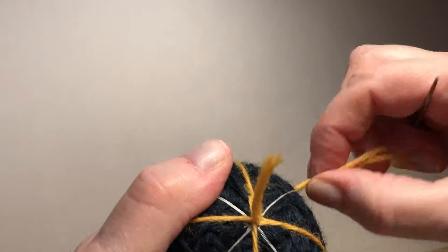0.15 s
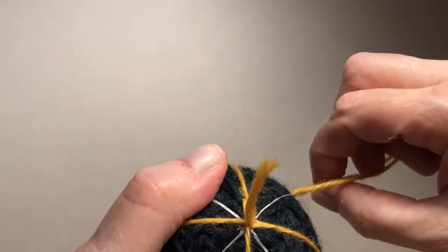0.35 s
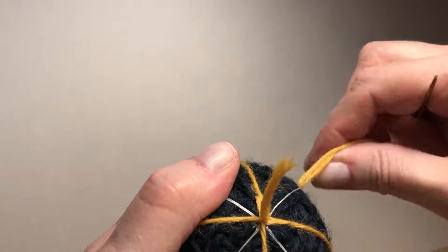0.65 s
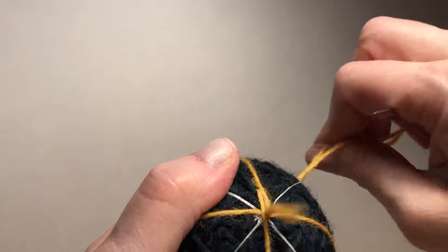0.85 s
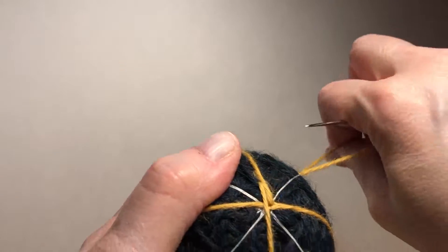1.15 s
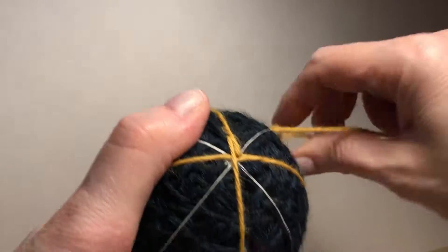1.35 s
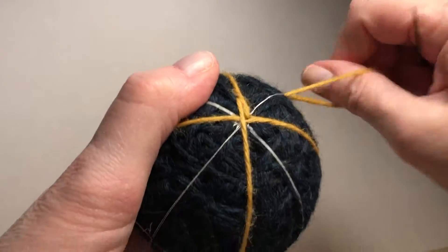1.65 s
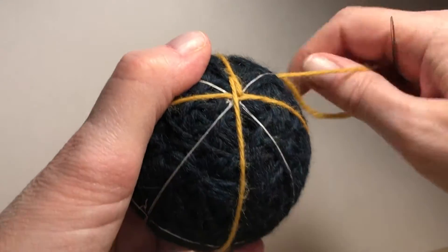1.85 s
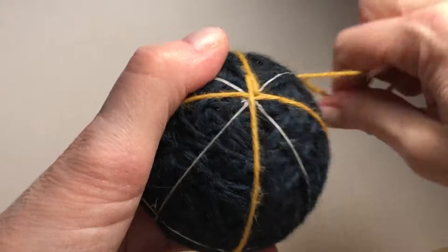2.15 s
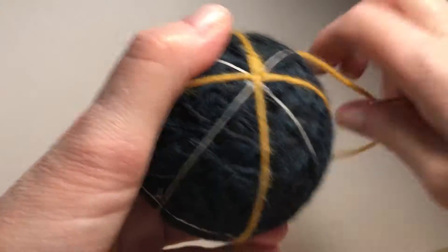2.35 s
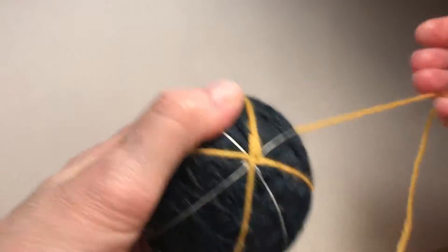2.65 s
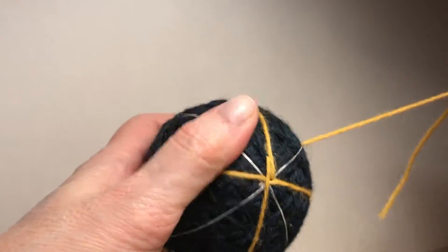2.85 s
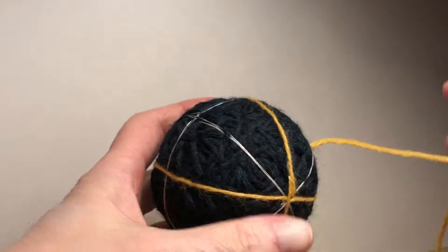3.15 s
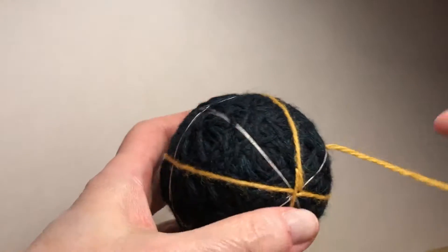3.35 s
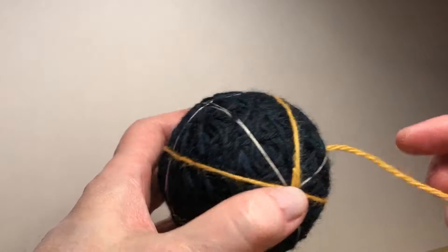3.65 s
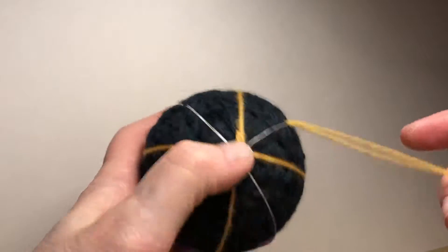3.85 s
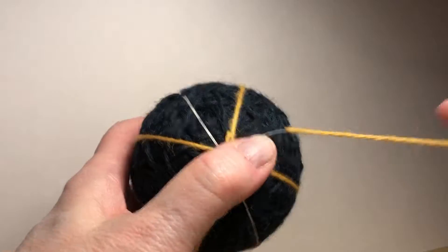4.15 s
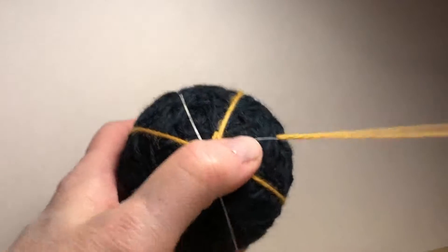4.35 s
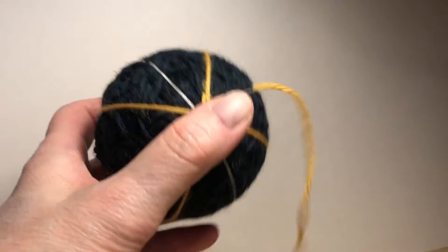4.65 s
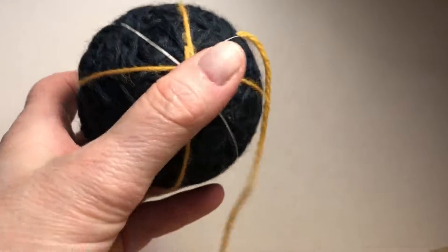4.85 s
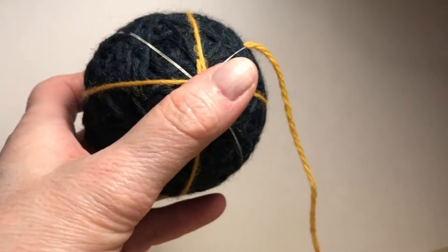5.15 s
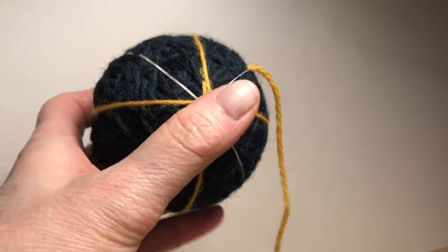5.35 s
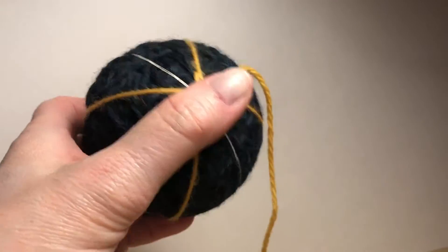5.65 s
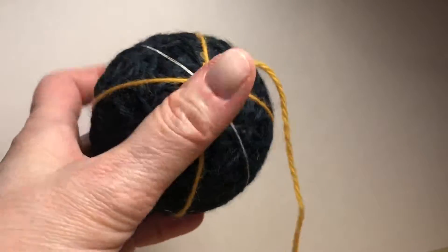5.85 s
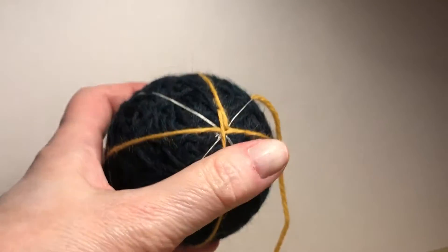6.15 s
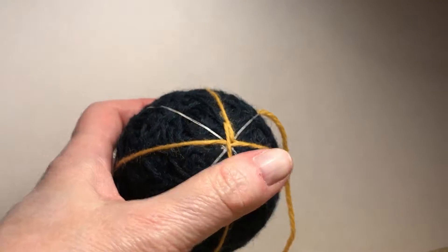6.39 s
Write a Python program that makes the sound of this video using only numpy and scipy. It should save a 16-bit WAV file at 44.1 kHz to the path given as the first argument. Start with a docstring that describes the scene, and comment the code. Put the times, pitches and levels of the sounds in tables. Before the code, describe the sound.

Thread rustles in short dry strokes with tiny needle ticks over a low indoor hum, then scissors snip sharply and clatter onto a table.

```python
"""A quiet room hums throughout: steady tones, a fan's air and a faintly buzzing lamp.
Thread is drawn around a yarn ball in short noisy strokes, with a few needle ticks; then it sings, pulled taut.
Small steel scissors are gripped with a soft knock, then snip with clicks, grinding and ringing blades.
Last, the scissors clatter onto a table and slide: noise bursts and friction excite its resonances."""
import sys
import numpy as np
from scipy import signal
from scipy.fft import rfft, irfft, next_fast_len
from scipy.io import wavfile
from scipy.ndimage import map_coordinates

SR = 44100
rng = np.random.default_rng(int(sys.argv[2]) if len(sys.argv) > 2 else 0)


def materialize(psi):
    """Save the field psi as 16-bit PCM at rate SR to the path in sys.argv[1].

    A 1-D psi becomes a single channel; in a 2-D psi each row is a channel.
    """
    bounded = np.clip(np.atleast_2d(psi).T, -1, 1)
    quanta = np.round(bounded * 32767).astype(np.int16)
    wavfile.write(sys.argv[1], SR, quanta)


N = 287516  # length in samples
TOP_HZ = 16050  # upper band limit


def amp(db):
    """Turn decibels into a gain."""
    return 10 ** (np.asarray(db) / 20)


def unit(x):
    """Scale to an rms of 1."""
    return x / np.sqrt(np.mean(np.abs(x) ** 2) + 1e-20)


def along(points, hz):
    """Read a curve of (Hz, value) points, with straight lines between them on a log frequency axis."""
    f, v = np.transpose(points)
    return np.interp(np.log(hz + 1), np.log(f + 1), v)


def wobble(rate):
    """A smooth random curve with this many random knots a second."""
    knots = rng.standard_normal(int(N * rate / SR) + 4)
    return map_coordinates(knots, [np.arange(N) * rate / SR])


def filtered(x, response):
    """Filter x by a function of frequency, scaled so that white noise keeps its power."""
    size = next_fast_len(N + SR // 2)
    gains = unit(response(np.fft.rfftfreq(size, 1 / SR)))
    return irfft(rfft(x, size) * gains, size)[:N]


def coloured(x, spectrum):
    """Give x the tone colour of (Hz, relative dB) points."""
    return filtered(x, lambda hz: amp(along(spectrum, hz)))


def resonate(x, modes, soft_hz=15000):
    """Let x ring in (Hz, width in Hz, relative dB) resonances, dulled above soft_hz as by a soft touch."""
    def response(f):
        ring = sum(amp(db) * 1j * f * width / (centre * centre - f * f + 1j * f * width)
                   for centre, width, db in modes)
        return ring / (1 + np.sqrt(2) * 1j * f / soft_hz - (f / soft_hz) ** 2)
    return filtered(x, response)


def friction(rate, spread_db):
    """Noise of rms 1 whose strength jumps with each tiny slip."""
    return unit(rng.standard_normal(N) * amp(spread_db * wobble(rate)))


def contacts(times, levels_db, t60):
    """Brief dying noise bursts; a level is the burst's energy spread over one millisecond."""
    force, t = np.zeros(N + SR), np.arange(SR // 20) / SR
    for start, db in zip(times, levels_db):
        burst = rng.standard_normal(len(t)) * amp(-60 * t / t60)
        burst *= np.sqrt(SR / 1000 / np.sum(burst ** 2))
        force[round(start * SR):][:len(t)] += amp(db) * burst
    return force[:N]


def swell(middle, length, shape):
    """A gain that rises to 1 and falls again, staying above half power for the given length."""
    u = np.abs(np.arange(N) / SR - middle) / (length / 2)
    return np.sqrt(.5 ** (np.minimum(u, 10) ** shape))


def strokes(rows, shape):
    """One gain curve for each dB column of (middle, length, dB, ..) rows; overlaps add in power."""
    return np.sqrt(sum(np.outer(amp(levels), swell(middle, length, shape)) ** 2
                       for middle, length, *levels in rows))


def held(start, end, attack_s, release_s, sag_db_per_s):
    """An attack, a hold that sags, then a release losing a further 60 dB in release_s."""
    t = np.arange(N) / SR
    fade_db = sag_db_per_s * np.maximum(t - start, 0) + 60 * np.maximum(t - end, 0) / release_s
    return np.clip((t - start) / attack_s, 0, 1) * amp(-fade_db)


# Mains and fan tones. Each row: pitch in Hz, level in dB.
HUM_TONES = [(119.4, -55), (71.5, -69.5), (110.6, -71.5), (145.9, -67), (221.3, -71), (328.5, -81)]
# Tone colour of the moving air. Each row: frequency in Hz, relative level in dB.
AIR_COLOUR = [(24, -46), (40, 0), (75, -1.5), (100, -1.5), (122, 3.5), (152, 1.5), (172, -9.5), (230, -6.5),
              (380, -11), (520, -19), (1000, -22.5), (2000, -27.5), (4500, -34.5), (15000, -41.5)]
# Resonances in the fan's air. Each row: pitch in Hz, width in Hz, relative level in dB.
FAN_MODES = [(584, 12.5, -0.5), (651, 25, 0.5), (895, 24, 1), (1085, 24, -0.5)]
# Resonances of the buzzing lamp. Each row: pitch in Hz, width in Hz, relative level in dB.
LAMP_MODES = [(6160, 200, -7.5), (9260, 120, 0), (9630, 160, -8), (9850, 93, -4.5)]
MAINS_BUZZ_HZ = 119.96  # lamp ticks a second: twice the mains frequency


def background():
    """Nearly steady hum, a fan's air, and a lamp that ticks once every half cycle of the mains."""
    t = np.arange(N) / SR
    hum = sum(np.sqrt(2) * amp(db + 0.31 * wobble(3.08)) * np.sin(2 * np.pi * hz * t + 0.16 * wobble(2.1))
              for hz, db in HUM_TONES)
    air = amp(-57) * coloured(rng.standard_normal(N), AIR_COLOUR)
    fan = amp(-73.5) * resonate(rng.standard_normal(N), FAN_MODES, soft_hz=1450)
    since_tick = (t * MAINS_BUZZ_HZ % 1 - .5) / MAINS_BUZZ_HZ  # seconds from the nearest tick
    ticks = unit(np.sinc(2 * TOP_HZ * since_tick))
    sizzle = unit(np.cos(np.pi * MAINS_BUZZ_HZ * since_tick) ** 2 * rng.standard_normal(N))
    lamp = amp(-79.5) * resonate(ticks + amp(-1) * sizzle, LAMP_MODES, soft_hz=14900)
    return hum + air + fan + lamp


# Strokes of thread. Each row: middle in seconds, length in seconds, then three levels in dB before
# any trim in thread(): rub on the fingers, rustle of the yarn, hiss of the fibres.
THREAD_STROKES = [(.382, 0.058, -57.5, -74, -63.5), (.456, 0.054, -62.5, -72, -74),
                  (.57, .046, -88, -88, -71.5), (.694, .047, -84, -82, -73), (.846, 0.035, -59, -76, -69),
                  (1.05, 0.13, -59.5, -63.5, -54), (1.238, .11, -80, -62.5, -62),
                  (1.55, .06, -75, -79, -70), (2.192, 0.048, -59.5, -64, -67),
                  (2.252, 0.053, -57, -62, -57.5), (2.345, 0.052, -64, -67, -66),
                  (2.611, 0.053, -67, -64.5, -69), (2.765, 0.037, -69, -72, -79),
                  (3.169, 0.058, -68, -65.5, -65), (3.442, 0.043, -80, -71, -76),
                  (4.05, 0.073, -74, -67.5, -78), (4.403, 0.15, -68, -71.5, -69),
                  (4.71, .044, -70, -75, -72)]
# Tone colours of the rub, the yarn and the fibres. Each row: frequency in Hz, relative level in dB.
RUB_COLOUR = [(700, -34), (1300, -12), (1520, -0.5), (1800, 2), (2120, -9), (2400, 0), (2850, -4),
              (3400, -10), (4300, -11), (6000, -11), (8000, -22)]
YARN_COLOUR = [(1200, -29), (2100, -8), (2600, -2.5), (3300, -2), (4100, -1), (4900, -4), (6500, -6.5),
               (9000, -12), (15000, -18)]
FIBRE_COLOUR = [(2500, -12), (3800, 0.5), (7000, -1), (9000, 1.5), (12000, -3), (15500, 6), (18000, -10)]
# Needle and fingernail ticks. Each row: start in seconds, level in dB before the trims in thread().
NEEDLE_TICKS = [(0.4364, -42.5), (0.467, -49), (0.4828, -38.5), (2.1032, -44.5), (2.426, -56), (4.349, -45)]
# Skin rubbing on the ball and on the scissor grips.
# Each row: middle in seconds, length in seconds, level in dB.
PALM_RUBS = [(1.66, 0.2, -66.5), (2.04, .22, -63), (5.479, 0.017, -56)]
# Tone colour of skin. Each row: frequency in Hz, relative level in dB.
SKIN_COLOUR = [(200, -13), (400, -2.5), (540, -3), (750, -14), (1300, -11), (2500, -27)]
STROKE_SHAPE = 3.1  # 2 = bell-shaped swell, higher = flatter top
# faint stirring of the fibres while the thread is handled; the hiss level is before its trim
HANDLING_END_S, STIR_RUSTLE_DB, STIR_HISS_DB, STIR_SWING_DB = 4.8, -77, -80, 4.5


def thread():
    """Each stroke swells and fades as fibres slide; the needle ticks on a nail, skin rubs ball and grips."""
    rub_gain, rustle_gain, hiss_gain = strokes(THREAD_STROKES, STROKE_SHAPE)
    stir = held(0, HANDLING_END_S, attack_s=0.015, release_s=0.54, sag_db_per_s=0)
    stir = stir * amp(STIR_SWING_DB * wobble(11))
    # strokes and stirring add in power
    rustle_gain = np.hypot(rustle_gain, amp(STIR_RUSTLE_DB) * stir)
    hiss_gain = np.hypot(hiss_gain, amp(STIR_HISS_DB) * stir)
    rub = amp(-3.5) * rub_gain * coloured(friction(rate=340, spread_db=2.5), RUB_COLOUR)
    rustle = rustle_gain * coloured(friction(rate=250, spread_db=1.5), YARN_COLOUR)
    hiss = amp(-1.5) * hiss_gain * coloured(friction(rate=710, spread_db=1.5), FIBRE_COLOUR)
    palm = strokes(PALM_RUBS, STROKE_SHAPE)[0] * coloured(friction(rate=120, spread_db=1.2), SKIN_COLOUR)
    tick_force = contacts(*np.transpose(NEEDLE_TICKS), t60=0.016)
    ticks = amp(-6.5) * coloured(tick_force, RUB_COLOUR) + amp(-13) * coloured(tick_force, FIBRE_COLOUR)
    return rub + rustle + hiss + palm + ticks


# the taut thread sings while it is pulled, and twangs once as it catches
TAUT_START_S, TAUT_END_S, TAUT_HZ, TAUT_DB, TAUT_SAG_DB_PER_S = 4.3, 4.69, 1790, -68, 15
TWANG_S, TWANG_DB, TWANG_T60_S = 4.35, -58, .06


def taut_thread():
    """Stick-slip on the stretched thread gives a thin note, unsteady in pitch and loudness."""
    pull = held(TAUT_START_S, TAUT_END_S, attack_s=0.057, release_s=.3, sag_db_per_s=TAUT_SAG_DB_PER_S)
    twang = held(TWANG_S, TWANG_S, attack_s=0.0012, release_s=TWANG_T60_S, sag_db_per_s=0)
    gain = amp(TAUT_DB) * pull + amp(TWANG_DB) * twang
    phase = 2 * np.pi * np.cumsum(TAUT_HZ * (1 + .035 * wobble(350))) / SR
    return np.sqrt(2) * gain * amp(2.8 * wobble(70)) * np.sin(phase)


# edge grinds along edge, lightly at first, then biting through the fibres
CLOSE_START_S, CLOSE_DB = 5.55, -48.5
BITE_START_S, BITE_END_S, BITE_DB, BITE_SAG_DB_PER_S = 5.618, 5.682, -41, 63
FIBRE_SNAPS_PER_S, FIBRE_SNAP_DB, FIBRE_SCATTER_DB = 170, 6, 1  # snap level is over the grinding


def fibre_snaps(count):
    """Fibres part one after another under the blades, unevenly in time and strength."""
    chance = rng.standard_normal((count, 2))
    times = BITE_START_S + (np.arange(count) + .5 + .25 * chance[:, 0]) / FIBRE_SNAPS_PER_S
    return contacts(times, FIBRE_SNAP_DB + FIBRE_SCATTER_DB * chance[:, 1], t60=0.0055)


# A soft knock as the handles are gripped, then blades catching as they close.
# Each row: start in seconds, edge click in dB, handle knock in dB, blade ring in dB.
SCISSOR_KNOCKS = [(5.4696, -70, -55, -85), (5.533, -30, -30, -52), (5.5468, -19.5, -29.5, -44),
                  (5.5516, -28, -27.5, -31), (5.563, -31, -37, -60), (5.5845, -28, -37, -60),
                  (5.5944, -18.5, -44, -48), (5.5978, -22.5, -28, -62), (5.605, -23, -36, -60)]
# Tone colour of the steel edges. Each row: frequency in Hz, relative level in dB.
EDGE_COLOUR = [(1500, -14), (3000, -7), (3900, -8), (4400, -2.5), (5000, -2), (5600, -3), (6300, 0.5),
               (7700, 0), (8400, -3), (9300, -2), (10100, -2), (11000, -3.5), (13400, 0), (15000, -1.5),
               (16500, -0.5), (19000, -30)]
# Resonances of the handles. Each row: pitch in Hz, width in Hz, relative level in dB.
HANDLE_MODES = [(500, 140, -7.5), (910, 320, -15), (1320, 105, 3), (1760, 430, -2), (2240, 93, -16),
                (2460, 78, -1.5), (2820, 160, -1), (3190, 84, -7.5)]
# The tabletop's low resonances. Each row: pitch in Hz, width in Hz, relative level in dB.
BOARD_MODES = [(237, 28, -6), (277, 28, 2.5), (425, 26, 1), (532, 44, 2.5), (566, 32, -6)]


def snip():
    """After a soft knock of the gripped handles, the blades catch and grind shut through the thread."""
    times, edge_db, knock_db, _ = np.transpose(SCISSOR_KNOCKS)
    closing = amp(CLOSE_DB) * held(CLOSE_START_S, BITE_START_S, attack_s=.003, release_s=0.05, sag_db_per_s=0)
    bite = amp(BITE_DB) * held(BITE_START_S, BITE_END_S, attack_s=0.0024, release_s=0.027,
                               sag_db_per_s=BITE_SAG_DB_PER_S)
    grind = (closing + bite) * friction(rate=700, spread_db=2.0) + bite * fibre_snaps(count=11)
    edge = coloured(contacts(times, edge_db, t60=0.011) + grind, EDGE_COLOUR)
    knock = contacts(times, knock_db, t60=0.005) + amp(-11) * grind
    handle = resonate(knock, HANDLE_MODES, soft_hz=6160)
    board = amp(-12.0) * resonate(knock, BOARD_MODES, soft_hz=1500)
    return edge + handle + board


# Ringing tones of the blades. Each row: pitch in Hz, relative level in dB, time to fall 60 dB in seconds.
BLADE_MODES = [(9290, -7, 0.036), (11580, -11, 0.21), (12276, 0.5, 0.18), (14500, 3, .03)]


def blades():
    """Every catch leaves the steel ringing in the same dying tones; the grip knock's ring is near silent."""
    ring, t = np.zeros(N + SR), np.arange(SR // 2) / SR
    one_ring = sum(amp(db - 60 * t / t60) * np.sin(2 * np.pi * hz * t) for hz, db, t60 in BLADE_MODES)
    for start, _, _, ring_db in SCISSOR_KNOCKS:
        ring[round(start * SR):][:len(t)] += amp(ring_db) * one_ring
    return ring[:N]


# chatter after a landing: first gap, each gap over the one before, and losses per bounce
BOUNCE_S, BOUNCE_SHRINK, METAL_LOSS_DB, THUD_LOSS_DB = .0045, .75, 7, 2.5


def chatter(times, levels_db, loss_db, t60, count):
    """Each landing is followed by ever quicker, ever weaker bounces; count includes the landing."""
    delays = np.cumsum([0, *(BOUNCE_S * BOUNCE_SHRINK ** np.arange(count - 1))])
    return sum(contacts(times + delay, levels_db - k * loss_db, t60) for k, delay in enumerate(delays))


# Scissors landing on the table. Each row: start in seconds, edge click in dB, shank clack in dB,
# table thud in dB before its trim in set_down(), push of the weight in dB.
LANDINGS = [(5.9024, -29, -27, -22, -34), (5.9524, -43, -48, -25, -34), (5.9697, -29.5, -30, -21.5, -25),
            (5.9915, -33, -35, -25.5, -39), (6.197, -24.5, -30.5, -50, -28.5),
            (6.2088, -33, -38, -55, -31.5), (6.2567, -28.5, -21, -42, -30)]
# Drags of the scissors over the table. Each row: middle in seconds, length in seconds,
# scrape in dB before the trims in set_down(), squeak in dB, dull grating in dB.
DRAGS = [(5.898, 0.0094, -62, -80, -37.5), (5.92, 0.036, -46, -73, -48), (5.959, 0.013, -48, -70, -30),
         (5.997, 0.036, -39.5, -50, -44), (6.058, 0.052, -55, -47.5, -62), (6.147, 0.025, -60, -38, -70),
         (6.228, 0.032, -42.5, -50, -65), (6.282, 0.023, -41, -49, -51)]
# Resonances of the shanks, table, squeak and grating.
# Each row: pitch in Hz, width in Hz, relative level in dB.
SHANK_MODES = [(1330, 75, -11), (1800, 250, -6), (2370, 270, -0.5), (2800, 230, -2), (3220, 190, .5)]
TABLE_MODES = [(426.6, 13, 2), (582, 16, -1), (760, 30, -11), (913, 10.6, 3), (1018, 22, 2),
               (1140, 25, -6.5), (1224, 28, 1), (1343, 85, -6), (1620, 52, -3), (1953, 20, 1),
               (2335, 50, -2.5)]
SQUEAK_MODES = [(1418, 49, -3.5), (2117, 98, 3.5), (2220, 65, -1.5), (5640, 330, -6.5), (7500, 1300, -18.5),
                (12800, 1000, -13), (14900, 700, -20)]
GRATING_MODES = [(1066, 240, -0.5), (1410, 400, 2.5)]


def set_down():
    """The scissors rattle onto the table, scrape and squeak, shaking both steel and tabletop."""
    times, edge_db, clack_db, thud_db, weight_db = np.transpose(LANDINGS)
    scrape_gain, squeak_gain, grating_gain = strokes(DRAGS, shape=2.1)
    scrape = scrape_gain * friction(rate=240, spread_db=3.0)
    click = chatter(times, edge_db, METAL_LOSS_DB, t60=0.014, count=4)
    edge = coloured(click + amp(-16) * scrape, EDGE_COLOUR)
    clack = chatter(times, clack_db, METAL_LOSS_DB, t60=0.0033, count=4)
    shanks = resonate(clack, SHANK_MODES, soft_hz=5000)
    handle = amp(-2.5) * resonate(scrape, HANDLE_MODES, soft_hz=4060)
    thud = chatter(times, thud_db, THUD_LOSS_DB, t60=0.0068, count=4)
    table = amp(-1.5) * resonate(thud + amp(-22) * scrape, TABLE_MODES, soft_hz=2260)
    weight = np.zeros(N)  # one single-sample push per landing
    weight[np.round(times * SR).astype(int)] = amp(weight_db) * np.sqrt(SR / 1000)
    board = resonate(weight + amp(-8) * scrape, BOARD_MODES, soft_hz=660)
    squeak = squeak_gain * resonate(friction(rate=500, spread_db=3), SQUEAK_MODES, soft_hz=15000)
    grating = grating_gain * resonate(friction(rate=430, spread_db=2), GRATING_MODES, soft_hz=2000)
    return edge + shanks + handle + table + board + squeak + grating


# How long the room rings. Each row: frequency in Hz, time to fall 60 dB in seconds.
ROOM_DECAY = [(200, 0.37), (2000, .36), (6000, 0.24), (15000, 0.14)]


def room(x):
    """A small room's tail: noise that starts a moment late and loses its treble first."""
    hz, t, noise = signal.stft(rng.standard_normal(SR // 2), SR, nperseg=256)
    fading = noise * amp(-60 * t / along(ROOM_DECAY, hz)[:, None])
    tail = signal.istft(fading, SR, nperseg=256)[1]
    tail = np.pad(tail / np.linalg.norm(tail), (SR // 300, 0))
    return signal.fftconvolve(x, tail)[:N]


def scene():
    """Hands, snip and table sound directly and, more softly, through the room, over the background."""
    yarn = thread() + taut_thread()
    cut = snip() + blades()
    table = set_down()
    to_room = amp(-14.0) * yarn + amp(-11.5) * cut + amp(-13.5) * table
    return (yarn + cut + table + room(to_room) + background())[None]


def record(dry):
    """The recorder's band limit: a 400 Hz wide slope around TOP_HZ, and nothing above it."""
    hz = np.fft.rfftfreq(N, 1 / SR)
    return irfft(rfft(dry) * np.clip((TOP_HZ - hz) / 400 + .5, 0, 1), N)


dry = scene()
out = record(dry)
materialize(out)
```